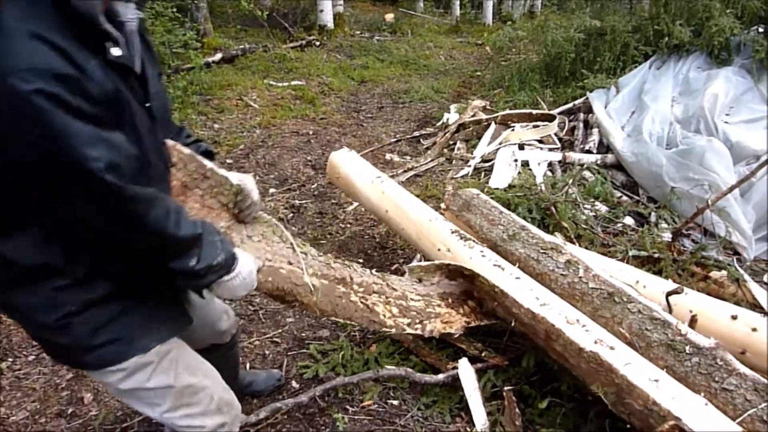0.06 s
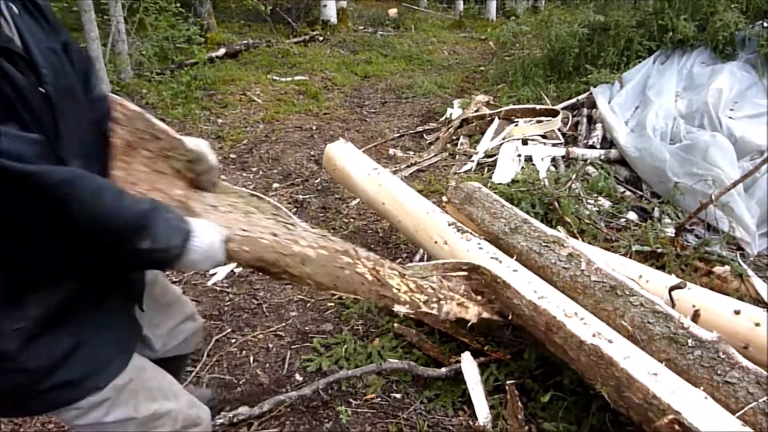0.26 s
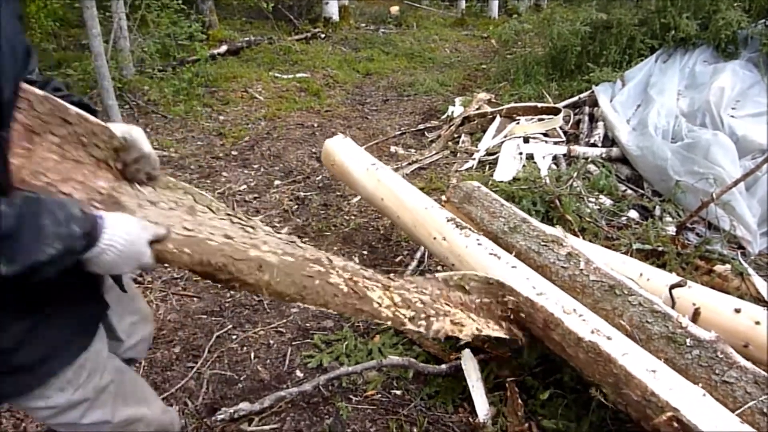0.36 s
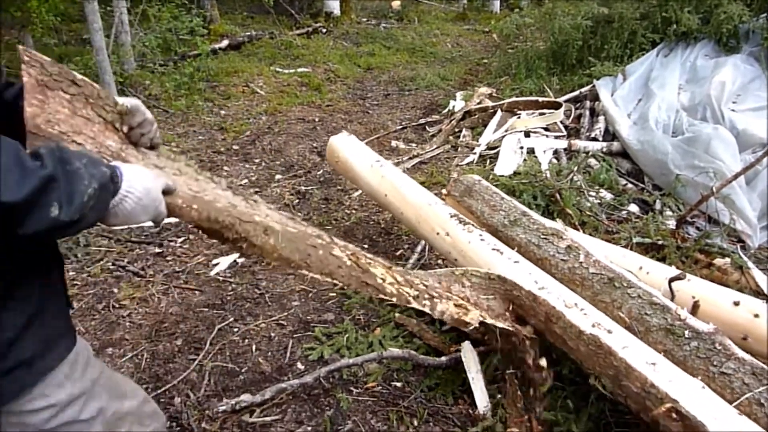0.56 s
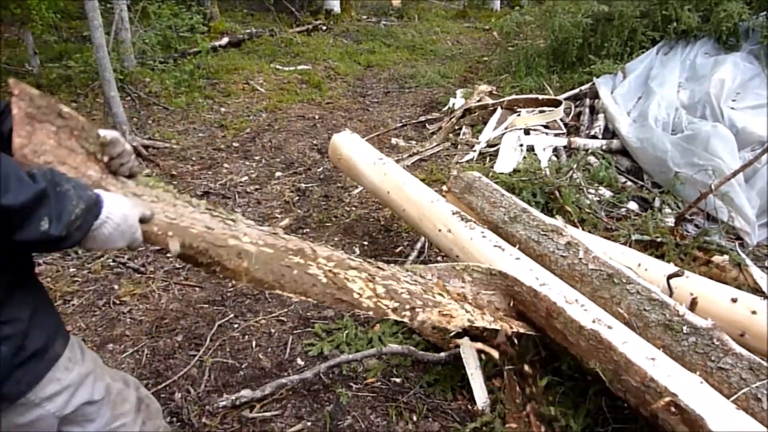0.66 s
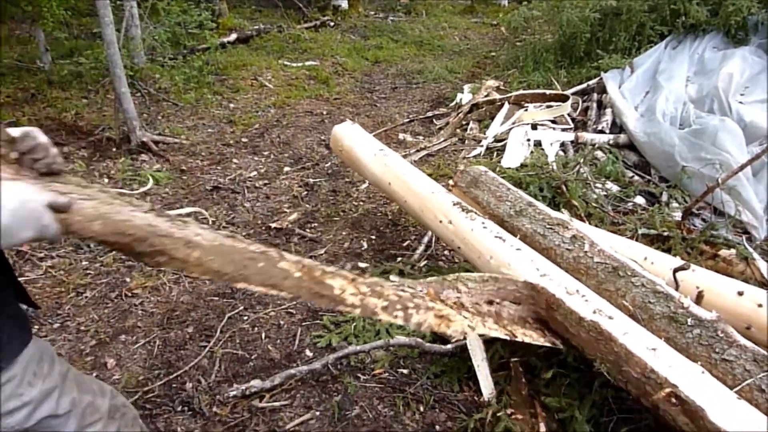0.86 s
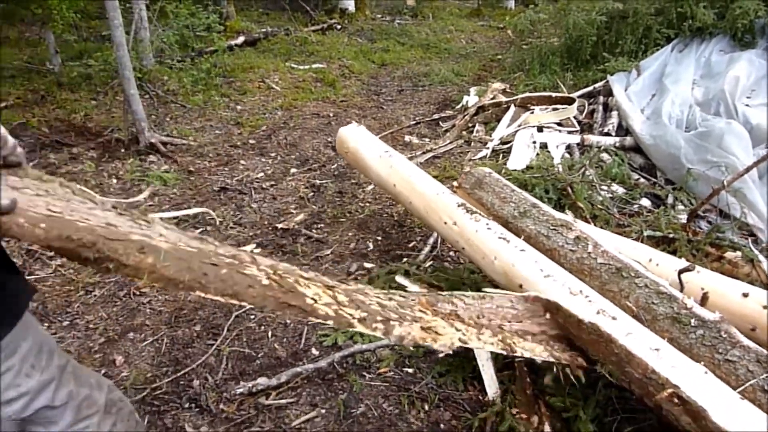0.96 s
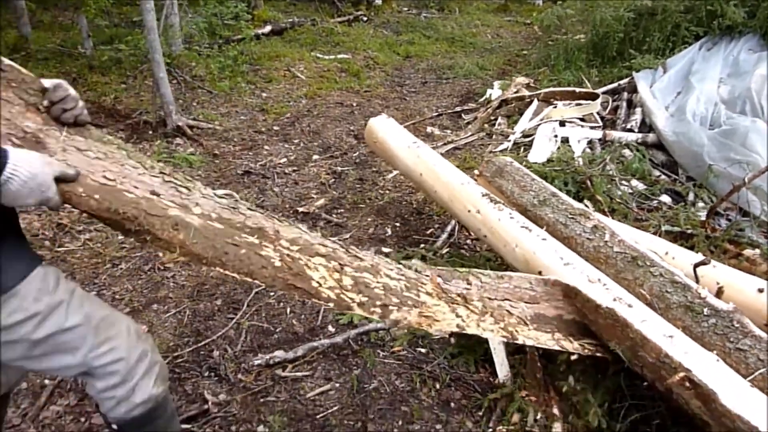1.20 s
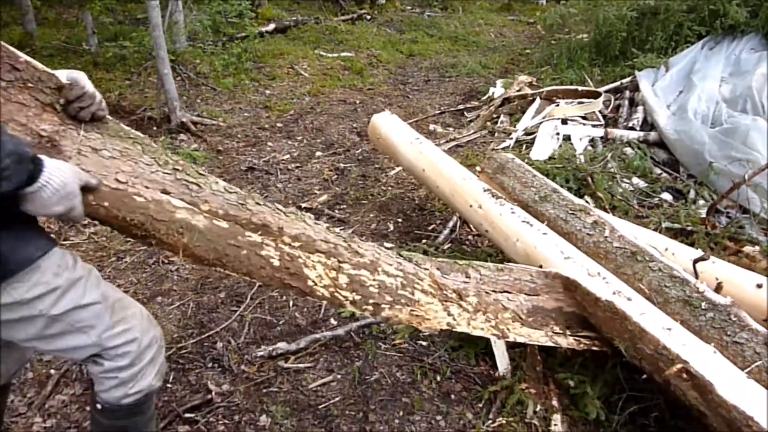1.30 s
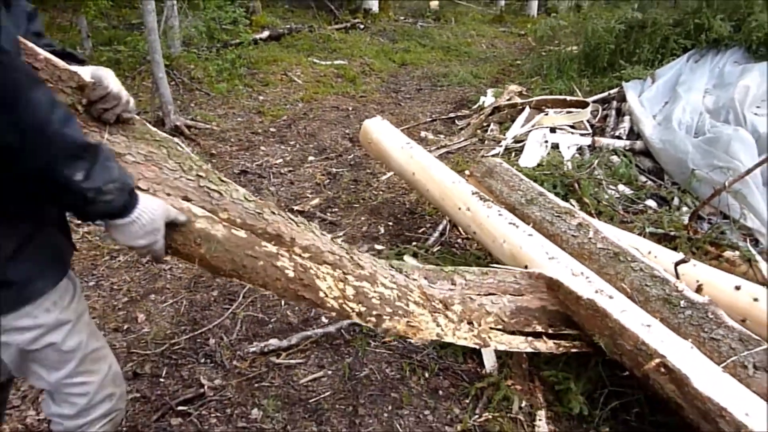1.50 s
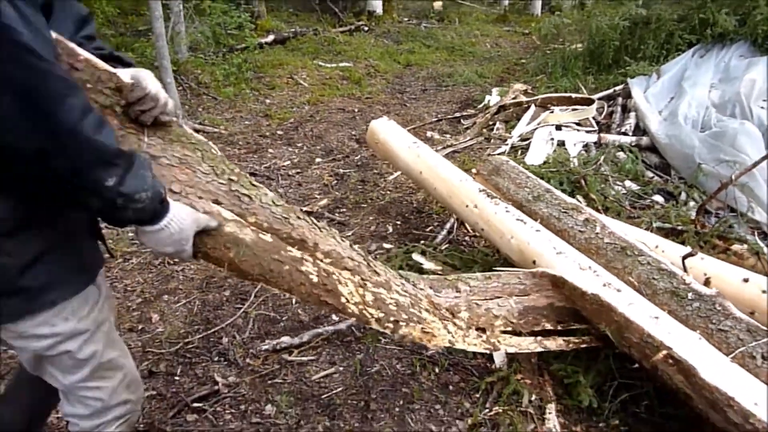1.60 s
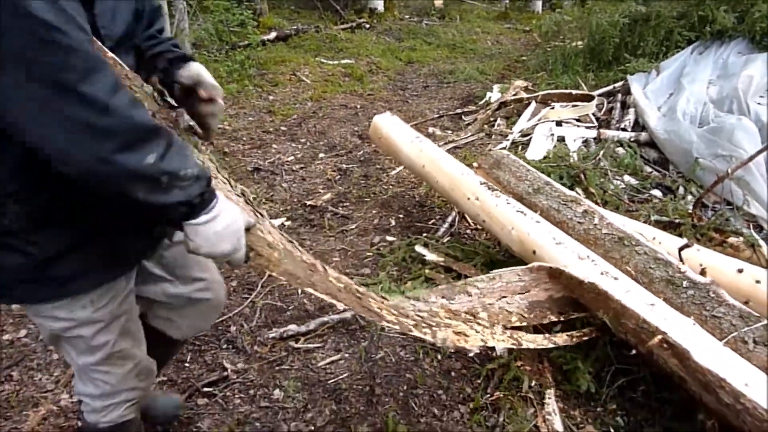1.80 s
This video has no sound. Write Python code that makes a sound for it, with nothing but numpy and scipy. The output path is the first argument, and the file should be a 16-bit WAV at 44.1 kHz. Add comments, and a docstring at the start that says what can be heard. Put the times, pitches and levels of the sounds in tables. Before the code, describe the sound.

Bark tearing off a log in two crackling pulls, with sharp woody cracks.

```python
"""Peeling bark in a wood

A long sheet of bark comes off a felled log in two pulls, close to a stereo microphone.
Fibres tear in a dense crackle that shakes the stiff sheet; thick strands give way with woody cracks
and dry flakes snap. Between pulls, sheet and litter rustle faintly over the far hush of the forest."""
import sys
import numpy as np
from scipy import signal
from scipy.fft import rfft, irfft, next_fast_len
from scipy.io import wavfile

SR = 44100
rng = np.random.default_rng(int(sys.argv[2]) if len(sys.argv) > 2 else 0)


def persist_wave(psi):
    """Save psi, clipped to +-1, as 16-bit WAV."""
    counts = np.round(np.clip(psi, -1, 1) * 32767).astype(np.int16)
    wavfile.write(sys.argv[1], SR, np.atleast_2d(counts).T)


N = 81585
TIME = np.arange(N) / SR
LOW_CUT_HZ = 162


def from_db(db):
    """Decibels to gain."""
    return 10 ** (np.asarray(db) / 20)


def rms_one(x):
    """Scale to unit rms."""
    return x / np.sqrt(np.mean(x ** 2) + 1e-20)


def level(rows):
    """Gain over time from (time_s, level_db) rows, silent outside them."""
    return from_db(np.interp(TIME, *np.transpose(rows), left=-150, right=-150))


def per_bin(points):
    """Read (freq_hz, value) rows on the frequency grid."""
    hz, value = np.transpose(points)
    return np.interp(np.log(np.linspace(1, SR / 2, next_fast_len(N) + 1)), np.log(hz), value)


def colour(x, gain):
    """Causal (minimum-phase) filter with the given gain per frequency."""
    half = len(gain) - 1
    cepstrum = irfft(np.log(gain + 1e-9))
    cepstrum[1:half] *= 2
    cepstrum[half + 1:] = 0
    return irfft(rfft(x, 2 * half) * np.exp(rfft(cepstrum)))[..., :N]


def band(x, low_hz, high_hz, order=2):
    """Butterworth band-pass."""
    return signal.sosfilt(signal.butter(order, [low_hz, high_hz], "band", fs=SR, output="sos"), x)


def drift(rate_hz):
    """Slow random wander of spread 1."""
    pole = np.exp(-2 * np.pi * rate_hz / SR)
    return rms_one(signal.lfilter([1], [1, -2 * pole, pole * pole], rng.standard_normal(2 * N))[N:])


def ring(x, hz, t60_s):
    """One resonance; a unit click sets it ringing with height about 1."""
    r = from_db(-60 / (t60_s * SR))
    return signal.lfilter([.5, 0, -.5], [1, -2 * r * np.cos(2 * np.pi * hz / SR), r * r], x + 1e-18)


def body(drive, modes):
    """Bark rings in its modes; each mode's level sets its share of the energy."""
    return sum(from_db(db) * ring(drive, hz, t60_s) / np.sqrt(t60_s * SR) for hz, db, t60_s in modes)


def grains(per_s, spread_db, clump_db, clump_hz):
    """Random clicks, mostly small and a few large, that come in clumps; rms 1."""
    sizes = from_db(spread_db * np.minimum(rng.exponential(1, N), 5)) * rng.choice([-1, 1], N)
    occurs = rng.random(N) < per_s / SR
    return rms_one(sizes * occurs * from_db(clump_db * drift(clump_hz)))


def placed(clicks):
    """Give every click a direction of its own: mid and side channels."""
    return np.array([clicks, np.roll(clicks, 1) * rng.standard_normal(N)])


def add(out, start_s, sound):
    """Lay a sound into a track at a time."""
    start = int(start_s * SR)
    out[..., start:start + sound.shape[-1]] += sound[..., :N - start]


# Spectrum of the distant wood: freq_hz, gain_db
FOREST_COLOUR = [(20, -2), (40, -3.5), (65, -2), (100, -1.5), (160, -5), (300, -4), (650, -0.5), (900, -3),
                 (1300, -7.5), (2200, -14), (4000, -16), (6000, -15.5), (8000, -20), (13000, -21),
                 (16000, -24.5)]
# How alike it arrives on the left and right: freq_hz, likeness (0-1)
FOREST_LIKENESS = [(60, 0.96), (180, 0.81), (550, 1), (1650, 0.55), (4970, 0.077), (15000, 0.017)]

def forest(level_db=-54):
    """Even, far hush of the wood all round the microphone, wider in the treble."""
    alike = np.clip(per_bin(FOREST_LIKENESS), 0, .99)
    gain = from_db(per_bin(FOREST_COLOUR))
    mid, side = [colour(rng.standard_normal(N), gain * np.sqrt(1 + sign * alike)) for sign in (1, -1)]
    return from_db(level_db) * rms_one(mid + side * [[1], [-1]])


# Loose bark and ground litter stirring: time_s, level_db
RUSTLE_LEVEL = [(0, -102), (0.11, -58.5), (0.14, -45.5), (0.165, -56.5), (0.21, -56.5), (0.5, -59.5),
                (0.62, -59), (1.11, -59.5), (1.2, -61), (1.3, -55), (1.36, -58), (1.48, -57), (1.555, -60),
                (1.605, -60.5), (1.7, -61.5), (1.85, -60.5)]
# Spectrum of that rustle: freq_hz, gain_db
RUSTLE_COLOUR = [(100, -11), (300, 9.5), (800, 2.5), (1500, 1), (2500, -5.5), (5000, -6), (8000, -6),
                 (13000, -10.5), (16000, -20)]
# Sleeves and trousers swish, a foot is set down: peak_s, level_db, half_length_s, low_hz, high_hz
SCUFFS = [(0.085, -58, 0.023, 230, 390), (0.13, -65, 0.027, 1200, 11800),
          (1.182, -56.5, 0.029, 4960, 14000), (1.287, -54.5, 0.021, 1000, 7000),
          (1.41, -55, 0.02, 138, 347), (1.418, -56, .04, 2500, 14000), (1.46, -56, 0.027, 696, 2170),
          (1.633, -58, 0.031, 497, 1690)]

def rustle(pan_db=2.5):
    """A little to the left, bark and litter crinkle quietly, with soft scuffs of cloth and boots."""
    shared, left, right = [grains(5000, spread_db=3, clump_db=2, clump_hz=34) for _ in range(3)]
    crinkle = shared + 0.55 * np.array([left, right])
    out = level(RUSTLE_LEVEL) * rms_one(colour(crinkle, from_db(per_bin(RUSTLE_COLOUR))))
    for peak_s, db, half_length_s, low_hz, high_hz in SCUFFS:
        width = min(1, np.sqrt(low_hz * high_hz) / 4000)
        rub = rng.standard_normal(N) + width * rng.standard_normal((2, N))
        swell = np.exp(-((TIME - peak_s) / half_length_s) ** 2)
        out += from_db(db) * swell * rms_one(band(rub, low_hz, high_hz))
    return out * from_db([[pan_db / 2], [-pan_db / 2]])


# Load on the sheet, driving its flutter and rumble, one list per pull: time_s, level_db
SHEET_LOAD = [
    [(0.236, -70), (0.249, -28.5), (0.275, -33), (0.305, -30.5), (0.35, -33), (0.39, -37), (0.407, -31),
     (0.42, -41), (0.46, -50)],
    [(0.72, -56), (0.778, -46), (0.82, -39), (0.88, -43), (0.912, -33), (0.955, -36), (0.984, -39.5),
     (0.996, -51), (1.02, -52)],
]

def flutter():
    """Dead centre, the heavy sheet gives a deep flutter while it is under load."""
    load = sum(map(level, SHEET_LOAD))
    return from_db(-25) * load * rms_one(band(rng.standard_normal(N), low_hz=30, high_hz=110))


# Bright resonances of the dry outer crust: pitch_hz, level_db, t60_s
CRUST_MODES = [(1855, -1, 0.023), (2017, 1, 0.086), (2450, -3.5, 0.078), (3010, -2, 0.072),
               (3101, -0.5, 0.044), (3280, -4.5, 0.12), (3723, -1, 0.03), (4170, -3.5, 0.11),
               (4960, 5, .04), (5477, 0, 0.048)]
# Dry flakes and thin strands snapping: start_s, strength_db, low_hz, high_hz
SNAPS = [(0.1248, -35.5, 8600, 15900), (0.1278, -19, 1000, 14400), (0.1532, -21, 1080, 11500),
         (0.2333, -31, 1200, 16000), (0.2423, -13, 980, 4400), (0.286, -48, 2500, 12000),
         (0.2895, -15.5, 2230, 4870), (0.3072, -13.5, 1480, 5800), (0.3225, -16, 2000, 7700),
         (0.3366, -8.5, 1780, 7400), (0.3495, -14, 1800, 6000), (0.352, -15.5, 1480, 9900),
         (0.3738, -22.5, 2460, 10800), (0.4074, -17.5, 1530, 4740), (0.4203, -34, 1890, 6500),
         (0.737, -32, 1200, 4500), (0.7507, -24.5, 1970, 4630), (0.7635, -31, 6000, 15000),
         (0.8423, -13, 8200, 14500), (0.9205, -17.5, 3000, 9700), (0.9316, -16.5, 2500, 5200),
         (0.9345, -15.5, 3550, 10500), (0.943, -19, 1110, 6100), (0.9432, -15, 1000, 5600),
         (0.963, -21.5, 3300, 6160), (0.9737, -20, 3500, 11800), (0.9882, -22, 1570, 4630),
         (1.265, -40, 1400, 4000), (1.281, -38, 1510, 6200), (1.606, -40, 2470, 6040),
         (1.762, -39, 1590, 5400)]

def snaps(splinter_db=-12, t60_s=.012, crust_db=-10):
    """Each snap is a sharp click and a brief splintering that ring in the crust; mid and side."""
    out, age_s = np.zeros((2, N)), TIME[:SR // 20]
    for start_s, db, low_hz, high_hz in SNAPS:
        burst = from_db(splinter_db - 60 * age_s / t60_s) * rng.standard_normal((2, len(age_s)))
        burst[0, 0] = 1  # the click, in the mid channel
        burst = band(burst, low_hz, high_hz)
        add(out, start_s, 2.01 * from_db(db) * burst / np.linalg.norm(burst[0]))
    return out + from_db(crust_db) * np.std(out) * rms_one(body(out, CRUST_MODES))


# Low resonances of the whole sheet: pitch_hz, level_db, t60_s
SHEET_MODES = [(168.6, -9.5, 0.042), (214, -3, 0.18), (259.3, -1.5, 0.1), (331.3, -4, 0.094),
               (474, -3.5, 0.05), (605, 2, 0.059), (677, -13, 0.076), (780, -38, 0.021),
               (1066, -6.5, 0.032), (1350, -28, 0.097)]
# Thick strands breaking: start_s, strength_db, pitch_hz
CRACKS = [(0.0873, -40, 720), (0.2428, -9, 932), (0.2472, -18, 740), (0.2501, -20, 500),
          (0.3058, -21.5, 1030), (0.4072, -19.5, 620), (0.7768, -25, 565), (0.9425, -14, 1026),
          (0.9458, -20.5, 600), (0.963, -25, 1120), (0.9884, -31.5, 750), (1.478, -43.5, 840),
          (1.522, -44, 750), (1.586, -41.5, 715), (1.606, -41.5, 1000)]

def cracks(rise_cycles=0.74, sharpness=1.22, overtone_ratio=1.96):
    """A strand lets go: a knock a few cycles long, a low thud and a kick to sheet and crust."""
    knocks, kicks = np.zeros(N), np.zeros(N)
    for start_s, db, pitch_hz in CRACKS:
        cycles = pitch_hz * TIME[:SR // 20]
        age, phase = cycles / rise_cycles, 2 * np.pi * cycles
        tone = np.sin(phase) + from_db(-12) * np.sin(overtone_ratio * phase)
        swell = (age * np.exp(1 - age)) ** sharpness
        add(knocks, start_s, from_db(db) * swell * tone)
        add(kicks, start_s, from_db([db]))
    sheet = from_db(-20.5) * body(kicks, SHEET_MODES)
    crust = from_db(-15) * body(band(kicks, LOW_CUT_HZ, high_hz=2100), CRUST_MODES)
    thud = from_db(-20) * ring(kicks, hz=180, t60_s=0.058)
    return knocks + np.sqrt(SR) / 10 * (sheet + crust) + thud


# Fibre crackle where the bark leaves the log, one list per pull: time_s, level_db
TEAR_LEVEL = [
    [(0.222, -57.5), (0.245, -43.5), (0.262, -43.5), (0.284, -32.5), (0.312, -37), (0.348, -30),
     (0.362, -34), (0.408, -34.5), (0.43, -45), (0.475, -58)],
    [(0.68, -55), (0.735, -52), (0.775, -41), (0.81, -41.5), (0.85, -34), (0.9, -37.5), (0.94, -36),
     (0.985, -36.5), (1.005, -47.5), (1.035, -58.5)],
]
# Spectrum of the crackle at close range: freq_hz, gain_db
FIBRE_COLOUR = [(100, -5), (400, -2.5), (1000, 1), (1500, 0), (2300, -6.5), (3200, -2.5), (4100, 2),
                (5200, -2), (6800, -3.5), (9500, -8), (13000, -8.5), (16000, -13.5)]

def tearing():
    """Fibres part by the thousand and ring in the crust; their tugs shake the sheet; mid and side."""
    tear, load = sum(map(level, TEAR_LEVEL)), sum(map(level, SHEET_LOAD))
    fibres = placed(grains(per_s=4800, spread_db=3.2, clump_db=0.6, clump_hz=128))
    crackle = tear * rms_one(colour(fibres, from_db(per_bin(FIBRE_COLOUR))))
    crust = body(fibres * tear, CRUST_MODES) / np.std(body(fibres, CRUST_MODES))
    tugs = placed(grains(per_s=2200, spread_db=2.5, clump_db=2.5, clump_hz=60))
    rumble = body(tugs * load, SHEET_MODES) / np.std(body(tugs, SHEET_MODES))
    return from_db(-2.5) * crackle + from_db(-12) * crust + from_db(0.5) * rumble


# Width of the bark at the microphone: freq_hz, side_gain_db
BARK_WIDTH = [(150, -31), (600, -24), (1200, -20), (2500, -10.5), (5000, -7), (12000, -1)]
# Its place between the channels: freq_hz, left_minus_right_db
BARK_PAN = [(400, 0), (1400, 0), (3000, -2.5), (12000, -2.2)]

def bark_at_microphone(mid, side, reflection_s=(0.0016, 0.0023)):
    """The bark is near, slightly right, wider in the treble; logs beside it give a quick reflection."""
    side = colour(side, from_db(per_bin(BARK_WIDTH)))
    pan_db = per_bin(BARK_PAN)
    direct = np.array([colour(mid + sign * side, from_db(sign * pan_db / 2)) for sign in (1, -1)])
    delayed = np.array([np.interp(TIME - lag, TIME, ear) for ear, lag in zip(direct, reflection_s)])
    reflection = from_db(-13) * band(delayed, low_hz=1520, high_hz=16100)
    low_cut = signal.butter(3, LOW_CUT_HZ, "high", fs=SR, output="sos")
    return signal.sosfilt(low_cut, direct + reflection)


def scene():
    """Peeling bark in front, faint rustle around it, the forest far behind."""
    mid, side = tearing() + snaps()
    return bark_at_microphone(mid + cracks(), side) + flutter() + rustle() + forest()


def record(dry, dip_depth=0.26, notch_hz=7880, cutoff_hz=15800):
    """The microphone has a shallow dip and a narrow notch in the treble; the top is cut."""
    dipped = dry - dip_depth * band(dry, low_hz=6140, high_hz=7300, order=1)
    notched = signal.lfilter(*signal.iirnotch(notch_hz, Q=17.6, fs=SR), dipped)
    return signal.sosfilt(signal.ellip(10, .2, 80, cutoff_hz, fs=SR, output="sos"), notched)


dry = scene()
out = record(dry)
persist_wave(out)
```